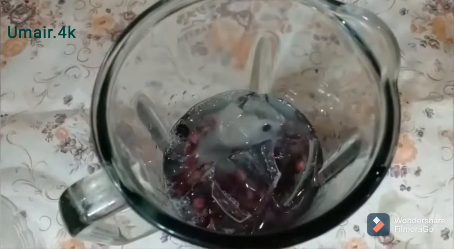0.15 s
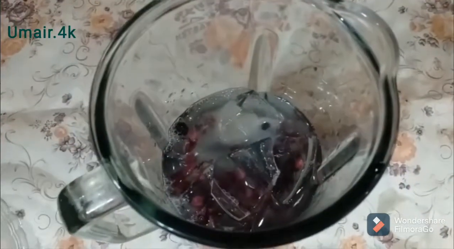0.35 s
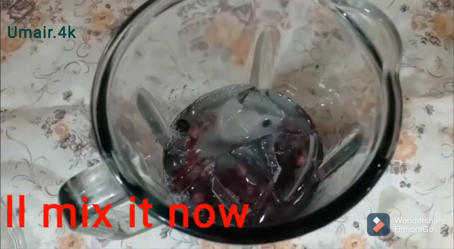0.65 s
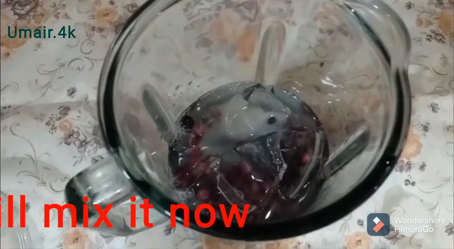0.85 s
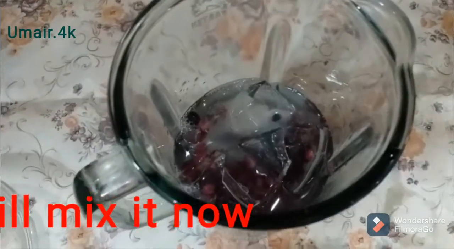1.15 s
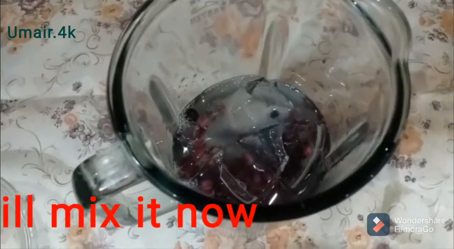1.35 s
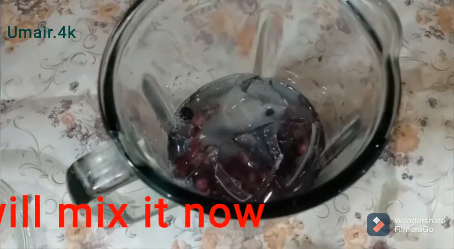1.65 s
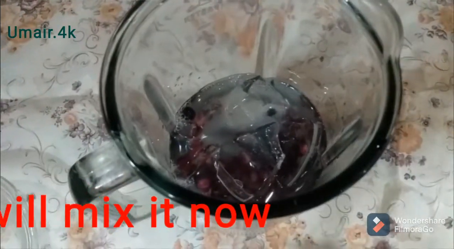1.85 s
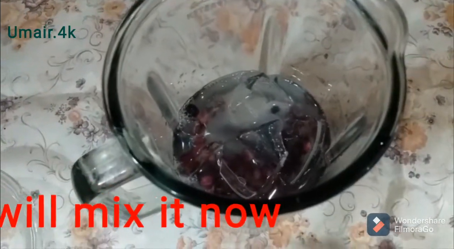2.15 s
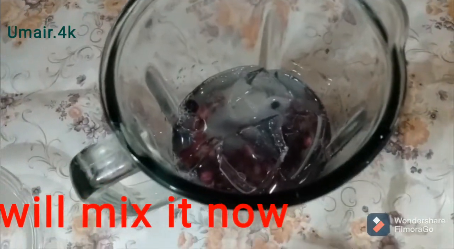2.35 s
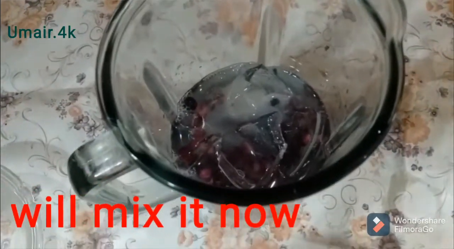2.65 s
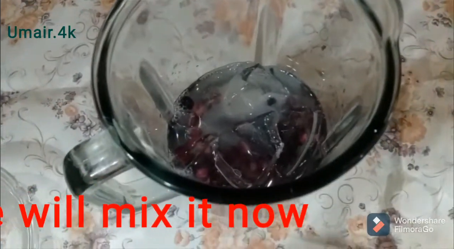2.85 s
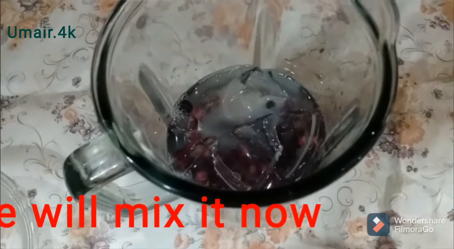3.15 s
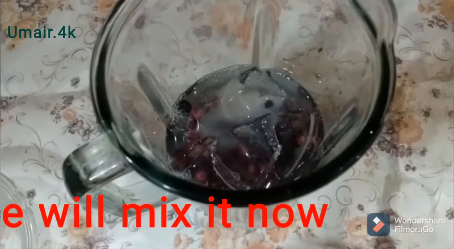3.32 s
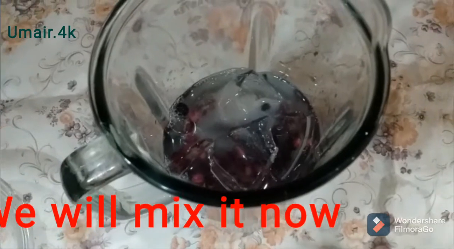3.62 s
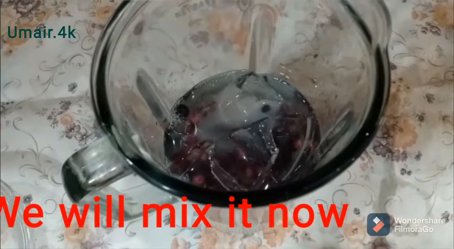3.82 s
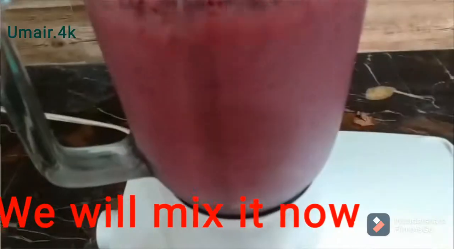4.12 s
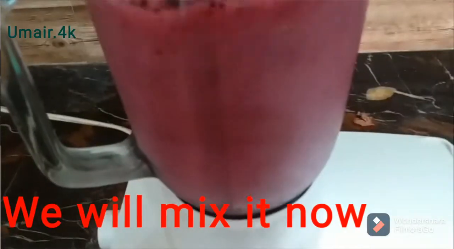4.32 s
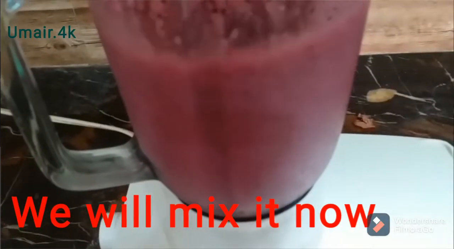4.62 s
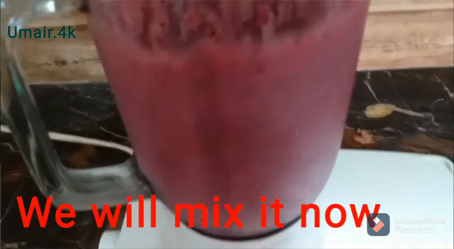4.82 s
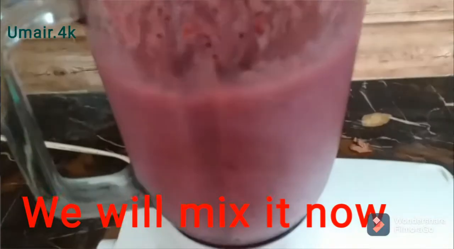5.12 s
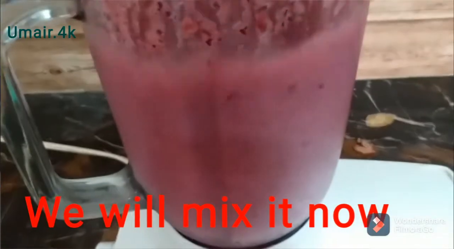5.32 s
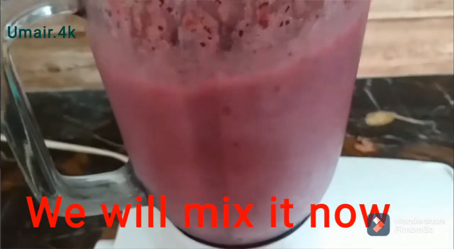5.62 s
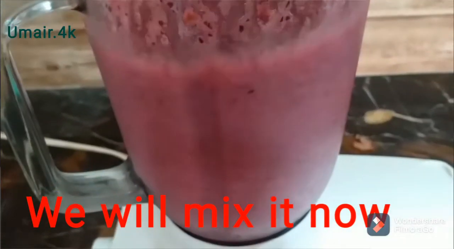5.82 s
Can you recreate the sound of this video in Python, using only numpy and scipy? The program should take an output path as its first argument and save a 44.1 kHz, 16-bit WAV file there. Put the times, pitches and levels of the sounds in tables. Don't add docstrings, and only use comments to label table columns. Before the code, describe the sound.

For nearly four seconds a quiet room breathes with soft hiss, wandering low traffic rumble and a very thin whine. A soft thud lands at 0.2 s, with a duller one at 0.5 s that rebounds and settles by 0.7 s, leaving low floor boom. At about 0.73 s a short distant horn beeps with street echo. Faint rising bird chirps repeat roughly every quarter second until 2.2 s, hoarse at first, then clearer. From 2.5 s the hiss fades; a dry, bright crackle peaks around 2.6-2.9 s, with tiny snaps at 3.5 s and a tick at 3.9 s. After a blink of silence, a loud close blender bursts in at 3.98 s, already at steady speed: low shaft hum, rough churning, heaving juice, dull thumps, fizzing spray and irregular sharp ice knocks ringing the glass. Near 5.75 s a brief lid buzz climbs slightly; the blender runs to the end.

```python
import sys
import numpy as np
from scipy import signal
from scipy.fft import rfft, irfft
from scipy.io import wavfile
from scipy.ndimage import uniform_filter1d

SR = 44100
rng = np.random.default_rng(int(sys.argv[2]) if len(sys.argv) > 2 else 0)


def to_wav(sig):
    pcm = np.clip(np.atleast_2d(sig), -1, 1) * 32767
    pcm = np.round(pcm).astype(np.int16)
    wavfile.write(sys.argv[1], SR, pcm.T)


def undo_db(level):
    steps = np.asarray(level, float) / 20
    return 10 ** steps


N = 263277

CUT_S, START_S = 3.947, 3.9796
KNOCK_RING_S = 0.0057
# (time [s], peak level [dB], table brightness [dB])
THUDS = [
    (0.1807, -19.5, -0.5),
    (.507, -24.5, -16),
    (.552, -26, -13),
    (.585, -36, -14),
    (0.619, -35, -20),
    (.66, -36, -20),
    (.7, -43, -20),
]


def level(x, db):
    return x * undo_db(db) / np.sqrt(np.mean(x ** 2))


def curve(table):
    return np.interp(np.arange(N) / SR, *np.transpose(table))


def colour(x, points, size=4096):
    hz, db = np.transpose(points)
    grid = np.maximum(np.arange(size // 2 + 1) * SR / size, 1)
    log_gain = np.log(undo_db(np.interp(np.log(grid), np.log(hz), db)))
    cep = irfft(log_gain)
    cep[1:size // 2] *= 2
    cep[size // 2 + 1:] = 0
    return signal.fftconvolve(x, irfft(np.exp(rfft(cep))))[:N]


def band(x, hz, width_hz):
    return signal.lfilter(*signal.iirpeak(hz, hz / width_hz, SR), x)


def noise():
    return rng.standard_normal(N)


def walk(rate):
    hold = int(SR / rate)
    steps = np.repeat(rng.standard_normal(N // hold + 1), hold)
    return 1.311 * uniform_filter1d(uniform_filter1d(steps, hold), hold)[:N]


def bursts(times, dbs, lengths):
    out, t = np.zeros(N + SR // 10), np.arange(SR // 10) / SR
    for s, db, length in zip(times, dbs, lengths):
        start = int(s * SR)
        out[start:start + len(t)] += undo_db(db) * np.exp(-t / max(length, 1 / SR))
    return out[:N]


def swell(s, db, rise_s, fade_s):
    out, t = np.zeros(N + SR), np.arange(SR) / SR
    start = int(s * SR)
    out[start:start + SR] = undo_db(db) * (1 - np.exp(-t / rise_s)) ** 2 * np.exp(-t / fade_s)
    return out[:N]


def room_tone():
    # (frequency [Hz], level per Hz [dB])
    air_spectrum = [(25, -47), (45, -10), (65, -7.5), (95, 2.5), (125, -5.5), (170, -7), (450, -8),
                    (1000, -14), (2600, -22), (4200, -29), (5300, -36.5), (5900, -54.5), (10000, -56),
                    (15000, -47.5)]
    fade_from_s, fade_db_per_s = 2.53, 3.5
    treble_db = -fade_db_per_s * np.maximum(np.arange(N) / SR - fade_from_s, 0)
    air = level(colour(noise(), air_spectrum), -42)
    low = signal.lfilter(*signal.butter(2, 140, fs=SR), air)
    hiss = signal.lfilter(*signal.butter(2, [2800, 6500], "band", fs=SR), air)
    wandering_bass = low * (undo_db(4 + 0.65 * walk(8.0)) - 1)
    fading_hiss = hiss * (undo_db(treble_db) - 1)
    air = air + wandering_bass + fading_hiss
    whine = level(band(noise(), 4150, 40), -72)
    return air * undo_db(-0.51 + 0.77 * walk(4.67)) + whine * undo_db(treble_db)


def horn():
    # (multiple of the pitch, level [dB])
    harmonics = [(1, 0), (2, -8), (3, -7), (4, -2)]
    start_s, pitch_hz = .727, 660
    phase = 2 * np.pi * np.cumsum(pitch_hz * (1 + 0.0073 * walk(90.3))) / SR
    tone = sum(undo_db(g + 4.0 * walk(118.7)) * np.sin(k * phase) for k, g in harmonics)
    direct = swell(start_s, -37.5, 0.0068, 0.027)
    echo = swell(start_s, -53, .03, .14)
    return tone * (direct + echo)


def bird():
    # (time [s], level [dB], hoarseness [Hz], length [s])
    chirps = [
        (0.064, -66.5, 900, 0.12),
        (0.27, -63, 1510, .1),
        (.5, -58.5, 1800, 0.068),
        (.708, -64.5, 1510, .12),
        (0.91, -64, 1300, .09),
        (1.13, -69, 250, .1),
        (1.363, -68, 250, .1),
        (1.612, -69, 250, 0.12),
        (1.845, -71, 250, 0.15),
        (2.1, -71, 300, .1),
    ]
    # (frequency [Hz], gain [dB])
    mic_gain = [(3000, 8), (5200, 5), (6500, 1), (8000, -33)]
    from_hz, to_hz = 4450, 5200
    out = np.zeros(N)
    for s, db, width_hz, length in chirps:
        u = np.linspace(0, 1, int(length * SR))
        throat = signal.butter(2, width_hz / 2, fs=SR)
        hoarse = signal.lfilter(*throat, rng.standard_normal((2, SR // 5)))[:, :len(u)]
        hz = from_hz + (to_hz - from_hz) * u + .3 * width_hz * (2 * u - 1)
        phase = 2 * np.pi * np.cumsum(hz) / SR
        call = level(hoarse[0] * np.cos(phase) + hoarse[1] * np.sin(phase), db)
        start = int(s * SR)
        out[start:start + len(u)] += call * np.sin(np.pi * u ** 0.25)
    echo = noise()[:SR // 4] * np.exp(-np.arange(SR // 4) / SR / 0.054)
    return colour(out + undo_db(-31) * signal.fftconvolve(out, echo)[:N], mic_gain)


def ticks():
    # (time [s], frequency [Hz], width [Hz], peak level [dB], fade [s])
    tick_rows = [
        (2.857, 4800, 5000, -55, .002),
        (3.908, 3720, 700, -53.5, .02),
    ]
    return sum(level(band(band(noise(), hz, width_hz), hz, width_hz), 0) * swell(s, db, 0.0011, fade_s)
               for s, hz, width_hz, db, fade_s in tick_rows)


def crackle():
    # (time [s], level [dB], swell [s], fade [s])
    strokes = [
        (.505, -57, .02, .04),
        (2.33, -76, .04, .08),
        (2.66, -66, .06, .05),
        (2.765, -60, .02, .06),
        (3.46, -73, .04, .02),
    ]
    # (time [s], level [dB])
    snap_rows = [(2.362, -73), (2.3924, -61), (2.613, -53), (2.6554, -54), (2.6674, -59), (2.7008, -49),
                 (2.7134, -52), (2.7214, -52), (2.7402, -48), (2.7554, -49), (2.7694, -55), (2.781, -44),
                 (2.7944, -45), (2.8044, -44), (2.8144, -52), (2.8244, -50), (2.8374, -55), (2.8494, -55),
                 (2.8574, -55), (2.9294, -66), (3.4705, -62), (3.482, -59), (3.5044, -58)]
    rustle = sum(swell(*stroke) for stroke in strokes)
    s, db = np.transpose(snap_rows)
    snaps = bursts(s, db - 4, np.full(len(s), .0012))
    bright = band(band(noise(), 15000, 2500), 15000, 5000)
    return level(bright, 0) * (rustle + snaps)


def boom():
    shake = sum(swell(s, db - 17.5, 0.01, 0.088) for s, db, _ in THUDS)
    return level(band(band(noise(), 78, 40), 72, 60), 0) * shake


def thuds():
    # (frequency [Hz], level [dB], time to fall 60 dB [s])
    floor_modes = [(60.6, 0.5, 0.59), (75, -3, 0.37), (102, -5, 0.071), (169, -0.5, 0.13), (206, 0, 0.069)]
    table_modes = [(302, -11, .07), (397, -8, 0.071), (572, -8.5, 0.11), (765, -12, .04), (900, -6, 0.049),
                   (1023, -5, 0.063), (1140, -11, .04), (1440, -13, 0.038), (1920, -16, 0.022)]
    out, t = np.zeros(N + SR), np.arange(SR // 2) / SR
    for s, db, bright_db in THUDS:
        modes = list(floor_modes) + [(hz, g + bright_db, t60) for hz, g, t60 in table_modes]
        detune = 1 + 0.036 * rng.standard_normal(len(modes))
        ring = sum(undo_db(g) * np.sin(2 * np.pi * hz * d * t) * 1000. ** (-t / t60)
                   for (hz, g, t60), d in zip(modes, detune))
        start = int(s * SR)
        out[start:start + len(t)] -= undo_db(db - 3) * ring * np.minimum(t / 0.0035, 1)
    return out[:N]


def lid():
    start_s, swell_s = 5.74, .05
    climb = np.clip((np.arange(N) / SR - start_s) / (2 * swell_s), 0, 1)
    buzz = np.sin(2 * np.pi * np.cumsum(1155 + 25 * climb) / SR)
    return undo_db(1.35 * walk(30)) * buzz * swell(start_s, -21.5, swell_s, .13)


def motor(load_db):
    # (time [s], rate [Hz])
    shaft_rate = [(3.98, 204.9), (4.6, 204.1), (5.2, 203), (5.5, 205.8), (5.75, 204.6), (5.97, 204)]
    # (multiple of the shaft rate, level [dB])
    shaft_lines = [(1, -38), (2, -46), (3, -42.5), (4, -47.5), (6, -35.5), (12, -43.5)]
    hz = curve(shaft_rate) * (1 + 0.00308 * walk(30) + 0.00305 * walk(9))
    phase = 2 * np.pi * np.cumsum(hz) / SR
    lines = sum(np.sqrt(2) * undo_db(db - .5 + 2.16 * walk(40)) * np.sin(k * phase + k) for k, db in shaft_lines)
    return lines * undo_db(0.69 * (load_db + 24))


def slosh(load_db):
    # (time [s], level [dB])
    heaves = [(3.968, -28.5), (4.165, -26.5), (4.235, -32), (4.335, -25.5), (4.42, -31), (4.545, -27.5),
              (4.636, -23), (4.71, -30.5), (4.785, -31), (4.895, -31), (4.98, -32), (5.15, -27),
              (5.22, -29.5), (5.285, -31), (5.345, -34), (5.445, -28.5), (5.515, -30), (5.59, -32),
              (5.68, -31), (5.735, -31), (5.816, -29), (5.885, -27)]
    hum = level(band(band(noise(), 156.6, 23.0), 139.5, 38), 0) * undo_db(load_db - 14.5)
    phase = 2 * np.pi * np.cumsum(150 * (1 + 0.0488 * walk(35))) / SR
    heaving = sum(swell(s, db + 13, 0.012, 0.029) for s, db in heaves)
    return hum + np.sin(phase) * undo_db(1.3 * walk(60)) * heaving


def thumps():
    # (time [s], peak level [dB])
    landings = [(3.98, -30.5), (4.2, -26), (4.337, -30), (4.395, -25), (4.582, -29), (4.637, -26),
                (4.718, -26), (4.764, -34), (4.885, -23.5), (4.94, -25), (4.983, -39), (5.034, -28),
                (5.13, -19), (5.341, -25.5), (5.392, -40), (5.51, -27), (5.6, -21), (5.65, -24.5),
                (5.703, -26), (5.782, -22.5), (5.846, -30), (5.912, -24)]
    s, db = np.transpose(landings)
    landing = bursts(s, db + 0.5, np.full(len(s), 0.021))
    return level(band(band(noise(), 272, 146), 254, 220), 0) * landing


def small_pieces():
    hit = rng.random(N) < 250 / SR
    strength = undo_db(2.5 * np.minimum(rng.exponential(size=N), 3) - 12)
    return signal.lfilter([1], [1, -np.exp(-1 / (0.0019 * SR))], hit * strength)


def lumps():
    # (time [s], peak level [dB], splinter level [dB])
    big_knocks = [(3.9835, -5.5, -32), (5.558, -6.5, -35), (4.112, -13, -35), (4.2271, -3.5, -27),
                  (4.2745, -8, -30), (4.3206, -6.5, -33), (4.3568, -4, -29), (4.3974, -6, -33),
                  (4.4642, -5.5, -40), (5.768, -4.5, -21), (4.669, -7, -30), (4.7138, -4.5, -25),
                  (4.763, -9, -36), (4.788, -1, -33), (4.9429, 0, -31), (5.3411, -13, -28),
                  (5.0405, -7.5, -33), (5.1358, -2, -28), (5.1539, -6.5, -30), (5.1721, -5.5, -24),
                  (5.2683, -14, -14), (5.4156, -1.5, -28), (5.5227, -7, -29), (5.597, -0.5, -33),
                  (5.8505, -4, -29), (5.673, -4, -24), (5.7022, 0.5, -33), (5.7998, -3.5, -24),
                  (5.8589, -2.5, -28), (5.9195, -3.5, -24)]
    count = 64
    place, chance = rng.random(count), rng.uniform(-1.2, 1, (count, 2))
    s = START_S + (np.arange(count) + place) * (N / SR - START_S) / count
    taps = np.array([-13.5, -30]) + 1.5 * chance
    gap_s = np.min(np.abs(s[:, None] - np.transpose(big_knocks)[0]), axis=1)
    return np.vstack([big_knocks, np.column_stack([s, taps])[gap_s > .016]])


def knocks(rows):
    # (frequency [Hz], level [dB], share of the ring time [ratio])
    glass_modes = [(1145, -17.5, 0.73), (1560, -18.5, 1.4), (1669, -14.5, 1.34), (1921, 1.5, 0.69),
                   (1962, -0.5, 0.82), (2150, -21, 0.62), (2480, -16.5, 1.6), (2840, -16, 0.2),
                   (3020, -21, 0.31), (3662, -3, 0.49), (3990, -8.5, 0.53), (4230, -6, 0.29),
                   (4800, -13, 0.41), (5340, -19, 0.33), (5760, -22, .4), (8400, -33.5, 0.67)]
    out, t = np.zeros(N + SR // 10), np.arange(SR // 10) / SR
    hz, mode_db, share = np.transpose(glass_modes)[:, :, None]
    chance = rng.standard_normal((len(rows), 3, len(glass_modes), 1))
    for (s, db, _), (tune, weight, turn) in zip(rows, chance):
        tones = np.sin(2 * np.pi * hz * (1 + 0.021 * tune) * t + 1.1 * turn)
        modes = tones * np.exp(-t / (KNOCK_RING_S * share))
        blow = np.sum(undo_db(mode_db + 2.5 * weight) * modes, axis=0) * np.minimum(t / .0005, 1)
        start = int(s * SR)
        out[start:start + len(t)] += undo_db(db - 6.0) * blow / np.max(np.abs(blow))
    return out[:N]


def jar(x):
    # (frequency [Hz], level per Hz [dB])
    churn_spectrum = [(18, -95), (30, -14.5), (145, -5), (342, -7), (404, -4.5), (456, -11.5), (607, -6.5),
                      (1080, -12), (1210, -8.5), (1400, -9.5), (1910, -3), (3070, -15), (3630, -13),
                      (5860, -22.5), (9000, -59), (11700, -88), (19800, -120)]
    # (frequency [Hz], width [Hz], level over the churn [dB])
    resonances = [(849, 18, 5), (1213, 29, 4), (1530, 24, 3), (1684, 48, 10.5), (1901, 34.6, 9),
                  (1978, 40, 8.5), (2175, 19, 4.5), (2506, 14, 12.5), (3693, 99, -1), (4125, 20, 12),
                  (4740, 26, 4), (5140, 36, 9.5), (5800, 32, 5.5)]
    broad = colour(x, churn_spectrum)
    return broad + sum((-1) ** k * undo_db(db) * band(broad, hz, width)
                       for k, (hz, width, db) in enumerate(resonances))


def blender():
    # (time [s], churn level [dB])
    load = [(3.985, -26), (4.005, -28), (4.04, -27.5), (4.14, -24), (4.25, -23), (4.4, -22), (4.55, -25.5),
            (4.66, -22), (4.9, -22), (5.05, -22.5), (5.125, -25), (5.14, -19.5), (5.18, -20.5), (5.22, -24),
            (5.4, -21), (5.63, -23), (5.8, -23), (5.97, -21.5)]
    # (frequency [Hz], level per Hz [dB])
    spray_spectrum = [(3800, -43), (6500, -17), (7730, -9.5), (8720, -11), (11000, -5.5), (13000, 2.5),
                      (14100, 0.5), (15200, 6), (15800, 4.5), (16500, 4.5)]
    load_db, rows = curve(load), lumps()
    s, db, splinter_db = rows.T
    surge, pieces = undo_db(1.5 * walk(70)), small_pieces()
    churn = surge * undo_db(load_db - 2.5) * (1 + pieces)
    grinding = bursts(s, db - 17.5, np.full(len(s), 1.63 * KNOCK_RING_S))

    split_hz = 950
    upper = signal.butter(3, split_hz, "high", fs=SR, output="sos")
    lower = signal.butter(3, split_hz, fs=SR, output="sos")
    ringing = jar(signal.sosfilt(upper, noise() * (churn + grinding))) / np.std(jar(noise()[:SR]))
    rumble = level(jar(signal.sosfilt(lower, noise())), 0) * undo_db(load_db - 7 + 0.7 * walk(15))

    splinters = bursts(s, db + splinter_db - 3.5, np.full(len(s), 0.75 * KNOCK_RING_S))
    spray = level(colour(noise(), spray_spectrum), 0)
    spray *= surge * undo_db(load_db - 20.5) * (1 + .8 * pieces) + splinters
    glass = ringing + knocks(rows) + spray
    return glass + rumble + thumps() + slosh(load_db) + motor(load_db) + lid()


def scene():
    t = np.arange(N) / SR
    before = np.clip((CUT_S - t) / 0.0015, 0, 1)
    after = np.clip((t - START_S) / 0.0004, 0, 1)
    room = room_tone() + horn() + bird() + ticks() + crackle() + boom() + thuds()
    return (before * room + after * blender())[None]


def low_pass(x):
    return signal.sosfilt(signal.butter(12, 16150, fs=SR, output="sos"), x)


def record(dry):
    bass_cut_hz, top_hz, headroom = 68.5, 15730, 0.82
    dry = signal.sosfilt(signal.butter(3, bass_cut_hz, "high", fs=SR, output="sos"), dry)
    dry = headroom * np.tanh(dry / headroom)
    dry = signal.sosfilt(signal.ellip(12, .2, 80, top_hz, fs=SR, output="sos"), dry)
    return low_pass(dry)


dry = scene()
out = record(dry)
to_wav(out)
```